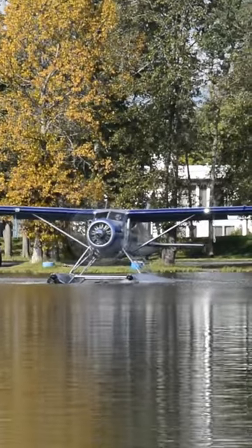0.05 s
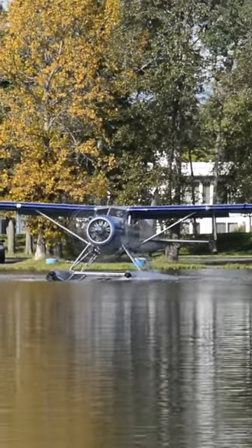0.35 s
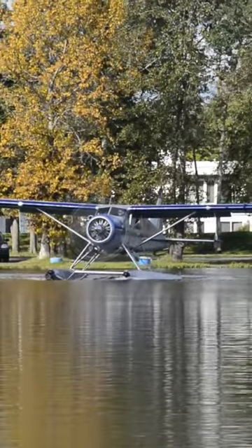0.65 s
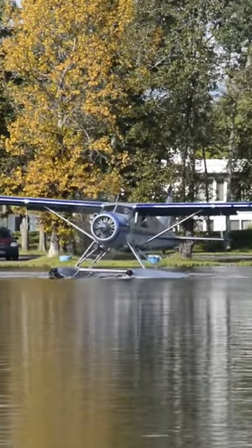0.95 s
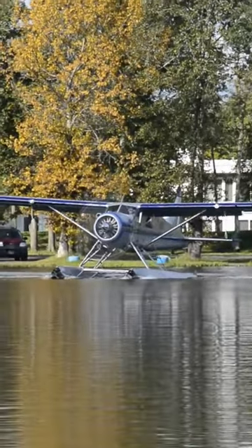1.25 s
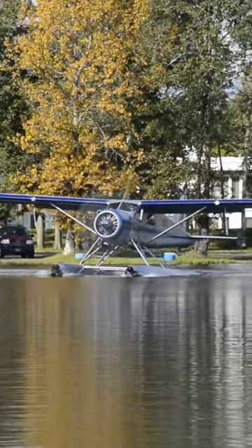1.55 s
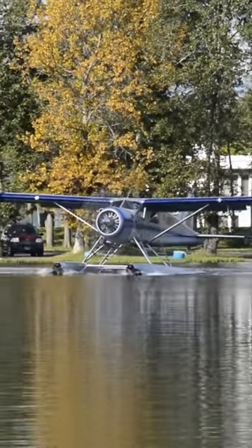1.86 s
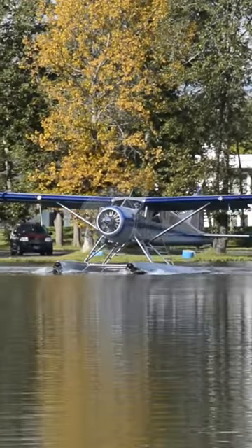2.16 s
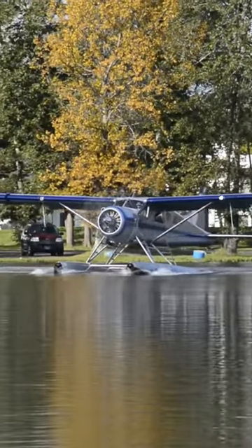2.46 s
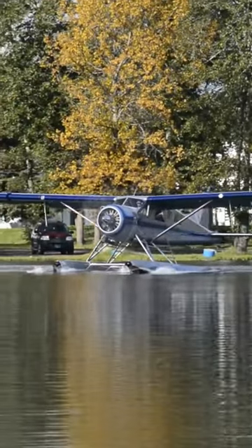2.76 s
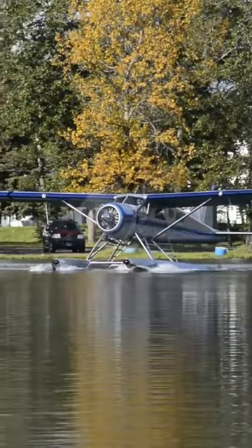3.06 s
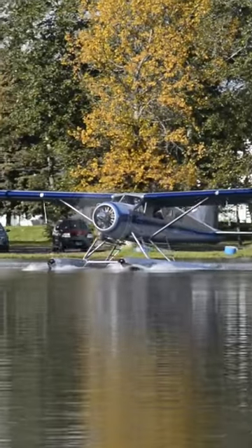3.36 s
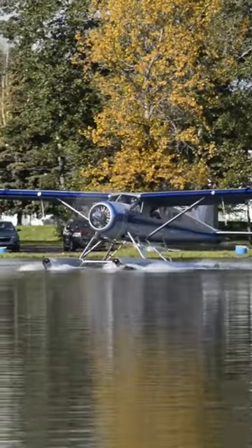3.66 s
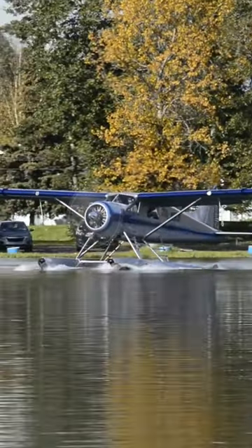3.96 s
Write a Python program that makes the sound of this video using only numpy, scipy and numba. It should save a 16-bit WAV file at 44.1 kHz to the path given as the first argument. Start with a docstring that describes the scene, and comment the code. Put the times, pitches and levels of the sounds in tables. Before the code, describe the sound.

A floatplane's propeller engine revs up, its roar growing louder with rapid blade slaps.

```python
"""On a lake, a floatplane opens its throttle. Its nine-cylinder engine speeds up, the air roars, and
the two propeller blades slap ever harder, echoed by the water and the trees on the shore.
Farther off, a second engine drones at a steady speed. A limiter (an automatic volume control)
turns everything down, drone and microphone hiss included, whenever the slaps get loud."""
import sys
import numpy as np
from scipy import signal
from scipy.fft import rfft, irfft, next_fast_len
from scipy.io import wavfile
from scipy.ndimage import map_coordinates
from numba import njit

SR = 44100
rng = np.random.default_rng(int(sys.argv[2]) if len(sys.argv) > 2 else 0)


def unload_audio(sound):
    """Save the sound as a 16-bit wav file, at the path given as the first command line argument."""
    columns = np.transpose(np.atleast_2d(sound))
    # keep every value between -1 and 1, then stretch to whole-number steps
    steps = np.round(np.clip(columns, -1, 1) * 32767)
    wavfile.write(sys.argv[1], SR, steps.astype(np.int16))


N = 176400
BLADES, CYLINDERS = 2, 9
# how often a blade sweeps past: t/s, rate/Hz
BLADE_RATE = [(0.0, 40.43), (0.6, 44.09), (1.2, 52.24), (1.8, 59.8), (2.4, 67.88), (2.8, 72.26),
              (3.2, 77.39), (3.6, 82.4), (4.0, 88.29)]
# how the blade slaps change: t/s, level/dB, centre f/Hz, share blurred by reflections (0-1)
SLAP_SHAPE = [(0, -22, 550, .8), (.33, -20, 550, .8), (.48, -12, 700, .7), (.68, -17, 600, .8),
              (.87, -9.5, 660, .6), (1.03, -14, 850, .8), (1.17, -10, 680, .7), (1.28, -10, 950, .8),
              (1.39, -7.5, 1200, .6), (1.48, -10, 800, .6), (1.58, -4.5, 740, .1), (1.68, -4.5, 720, .05),
              (1.75, -8, 740, .2), (1.81, -7, 760, .4), (1.93, -11, 1200, .8), (2.0, -7, 720, .4),
              (2.1, -9.5, 760, .6), (2.17, -9, 950, .8), (2.25, -4.5, 680, .6), (2.33, -2.5, 850, .3),
              (2.46, -5, 780, .5), (2.57, -1.5, 850, .3), (2.66, -.5, 680, .1), (2.75, -1.5, 680, .15),
              (2.85, 2.5, 590, .03), (3, 3.5, 780, .02), (3.07, -4, 880, .3), (3.13, .5, 880, .1),
              (3.19, -6, 850, .6), (3.26, -1.5, 770, .1), (3.37, 2.5, 750, .03), (3.54, 4.5, 700, .02),
              (3.66, 1.5, 680, .08), (3.74, 0, 1350, .3), (3.81, 0, 650, .2), (3.9, 1.5, 660, .1),
              (4, 2, 820, .1)]


def amp(db):
    """Turn decibels into a factor to multiply by."""
    return 10 ** (np.asarray(db) / 20)


def unit(x):
    """Scale x to an average (rms) size of 1."""
    return x / np.sqrt(np.mean(x ** 2) + 1e-20)


def curves(rows):
    """Join a table's rows with straight lines: one curve for each column after the time."""
    times, *columns = np.transpose(rows)
    return [np.interp(np.arange(N) / SR, times, column) for column in columns]


def wobble(rate):
    """A smooth curve through `rate` random values a second."""
    return map_coordinates(rng.standard_normal(400), [np.arange(N) * rate / SR], mode="mirror")


def colour(points, hz):
    """How strong each frequency is, read from a table of f/Hz, level/dB."""
    f, db = np.transpose(points)
    return amp(np.interp(np.log(hz + 1), np.log(f + 1), db))


def filtered(x, response):
    """Multiply each frequency in x by response(hz)."""
    size = next_fast_len(N + SR // 2)
    return irfft(rfft(x, size) * response(np.fft.rfftfreq(size, 1 / SR)), size)[:N]


def noise(points):
    """Noise with the given tone colour and an average size of 1."""
    return unit(filtered(rng.standard_normal(N), lambda hz: colour(points, hz)))


def pulses(cycles, jitter_s, scatter_db, pattern=(1,)):
    """One click at each whole cycle, uneven in time (jitter) and size (scatter)."""
    count = np.arange(1, int(cycles[-1]) + 1)
    chance = rng.standard_normal((2000, 2))[count]
    on_time = np.interp(count, cycles, np.arange(N))
    at = np.clip(on_time + SR * jitter_s * chance[:, 0], 0, N - 2)
    size = amp(scatter_db * chance[:, 1]) * np.take(pattern, count, mode="wrap")
    i = at.astype(int)  # each click is shared between two neighbouring samples
    return np.bincount(i, size * (1 - at + i), N) + np.bincount(i + 1, size * (at - i), N)


def delayed(x, seconds):
    """x arriving later; the delay may vary."""
    return np.interp(np.arange(N) - seconds * SR, np.arange(N), x, left=0)


def scattered(x, fade_s):
    """x blurred by countless small reflections that die away by 60 dB in fade_s."""
    tail = rng.standard_normal(SR) * amp(-60 * np.arange(SR) / SR / fade_s)
    return signal.fftconvolve(x, tail / np.linalg.norm(tail))[:N]


def drifting(x, fade_s, rate):
    """x blurred by reflections whose paths change `rate` times a second."""
    paths = np.array([wobble(rate) for _ in range(6)])
    return sum(share * scattered(x, fade_s) for share in paths / np.linalg.norm(paths, axis=0))


def hiss(level_db=-42.5):
    """The microphone's own even hiss."""
    # tone colour of the hiss: f/Hz, level/dB
    hiss_colour = [(30, -12), (3000, 11), (8000, -11), (15000, -13.5)]
    return amp(level_db) * noise(hiss_colour)


def far_engine(waver_db=2, rumble_db=-25):
    """A distant engine at constant speed: wavering tones over a throaty rumble."""
    # the engine's tones: f/Hz, relative level/dB
    drone_tones = [(96.5, -31), (138.5, -45.5), (207.3, -24.5), (279, -31), (414.5, -29.5)]
    # how the tones swell and dip together: t/s, gain/dB
    swell = [(0, 0), (.8, 3), (1.3, -0.5), (1.55, -8), (1.85, 1), (2.5, 1), (2.8, -3), (4, -3.5)]
    # tone colour of the rumble: f/Hz, level/dB
    rumble_colour = [(40, -22), (150, -16), (240, -9.5), (290, -1.5), (335, -7), (390, -1), (460, -6.5),
                     (540, -15.5), (1500, -19.5), (8000, -72)]
    t = np.arange(N) / SR
    tones = sum(amp(db + waver_db * wobble(7.17)) * np.sin(2 * np.pi * hz * t + .5 * wobble(10))
                for hz, db in drone_tones)
    return np.sqrt(2) * amp(curves(swell)[0]) * tones + amp(rumble_db) * noise(rumble_colour)


def exhaust(turns, rumble_db=-2.5):
    """Unequal cylinders each fire once in two shaft turns, over rushing gas and clean low tones."""
    # tone colour of the firings and gas: f/Hz, level/dB
    gas_colour = [(25, -37), (42, -14.5), (60, 1), (100, -4), (170, -1.5), (240, -10), (380, -11),
                  (550, -15), (1000, -20), (3000, -41), (8000, -102)]
    # tones that rise with engine speed: multiple of the shaft rate, relative level/dB
    shaft_tones = [(3, -10.5), (4, -27), (4.5, -19), (5, -21.5), (6, -15), (7, -18.5), (9, -18.5)]
    # loudness of the whole exhaust: t/s, gain/dB
    loudness = [(0, -16), (1.3, -16.5), (1.6, -18.5), (1.87, -15), (2.5, -16.5), (2.9, -19), (3.2, -17.5),
                (3.55, -16.5), (3.75, -13), (4, -14)]
    strengths = amp(2 * rng.standard_normal(CYLINDERS))
    firings = pulses(turns * CYLINDERS / 2, jitter_s=.0006, scatter_db=2.5, pattern=strengths)
    gas = unit(scattered(firings, fade_s=.062)) + rng.standard_normal(N)
    rumble = unit(filtered(gas, lambda hz: colour(gas_colour, hz)))
    tones = sum(amp(db + .34 * wobble(3.84)) * np.sin(2 * np.pi * multiple * turns + .39 * wobble(5.86))
                for multiple, db in shaft_tones)
    return amp(curves(loudness)[0]) * (amp(rumble_db) * rumble + np.sqrt(2) * tones)


def roar(passes, throb_db=1.6, rasp_db=-4, flutter_db=.73):
    """Churned air swells with every passing blade, and scattered blade pulses add a rasp."""
    # tone colour of the roar: f/Hz, level/dB
    roar_colour = [(60, -13), (250, -4.5), (450, 2), (700, -2), (1200, -3.5), (1800, -9), (2400, -10),
                   (3200, -19), (4100, -21.5), (5000, -32.5), (6200, -38.5), (7200, -55.5), (12000, -56.5)]
    # narrow bands that ring out: f/Hz, width/Hz, boost/dB
    resonances = [(1240, 70, 3), (1390, 40, 2), (1525, 45, 4), (1684, 45, 4), (1837, 70, 3.5),
                  (3020, 90, 2)]
    # loudness of the roar: t/s, level/dB
    loudness = [(0, -30), (.7, -28), (1, -25.5), (1.35, -23), (1.65, -23), (1.9, -22), (2.15, -22),
                (2.5, -19), (2.75, -19), (2.95, -18), (3.1, -17), (3.28, -18.5), (3.37, -15), (3.45, -15.5),
                (3.53, -13.5), (3.64, -14.5), (3.73, -9.5), (3.8, -12), (3.9, -14), (4, -12.5)]

    def tone(hz):
        boost_db = sum(db * np.exp(-((hz - centre) / width) ** 2) for centre, width, db in resonances)
        return colour(roar_colour, hz) * amp(boost_db)

    churn = amp(throb_db * np.cos(2 * np.pi * passes)) * rng.standard_normal(N)
    blade_pulses = pulses(passes, jitter_s=.00003, scatter_db=3.5)
    rasp = drifting(blade_pulses, fade_s=.05, rate=5)
    air = filtered(unit(churn) + amp(rasp_db) * unit(rasp), tone)
    return amp(curves(loudness)[0] + flutter_db * wobble(16)) * unit(air)


def cracks(passes, base_db=-18, growth=1.2):
    """The steep front of each slap cracks, more so when it is loud; a few blades snap far harder."""
    # the hardest snaps: t/s, relative level/dB
    hard_snaps = [(2.628, -9), (2.699, -10), (2.837, -6), (2.892, -7), (3.376, -8), (3.55, -5), (3.658, -4),
                  (3.742, -3), (3.823, -5), (3.894, -4)]
    # tone colour of a crack: f/Hz, level/dB
    crack_colour = [(300, -20), (2500, 3), (5000, -1), (8000, -8), (15000, -17)]
    sizes = np.zeros(int(passes[-1]) + 1)
    for time_s, db in hard_snaps:
        nearest_blade = round(passes[round(time_s * SR)])
        sizes[nearest_blade] = amp(db)
    snaps = pulses(passes, jitter_s=0, scatter_db=5, pattern=sizes)
    slap_db = curves(SLAP_SHAPE)[0]
    crackle = amp(base_db + growth * slap_db) * pulses(passes, jitter_s=.0001, scatter_db=4.5)
    return filtered(snaps + crackle, lambda hz: colour(crack_colour, hz))


def propeller(passes, base_hz=700, sway_s=.00039, echo_hold=.25, shore_db=-15):
    """Each blade slaps out a short push-pull wave that arrives clean, blurred and as echoes."""
    # tone colour of a slap centred on base_hz: f/Hz, level/dB
    slap_colour = [(60, -26), (200, -14), (400, -3.5), (620, 0), (900, -2), (1300, -14), (2000, -23),
                   (3000, -33), (4500, -45), (7000, -62), (12000, -88)]
    # echoes from the water and the shore: delay/s, relative level/dB
    echo_paths = [(.0011, -25), (.0029, -21), (.047, -19)]
    level_db, centre_hz, blur = curves(SLAP_SHAPE)
    # 1j turns an even bump into a push and a pull
    wave = filtered(signal.unit_impulse(N, "mid"), lambda hz: 1j * colour(slap_colour, hz))
    wave /= np.abs(wave).max()
    blade = np.round(passes).astype(int)
    since_pass_s = (passes - blade) / curves(BLADE_RATE)[0]
    position = N // 2 + since_pass_s * SR * centre_hz / base_hz  # a higher centre makes a shorter slap
    uneven_db = rng.standard_normal(blade[-1] + 1)[blade]
    slaps = amp(level_db + uneven_db) * np.interp(position, np.arange(N), wave)
    arriving = np.sqrt(1 - blur) * slaps + np.sqrt(blur) * drifting(slaps, fade_s=.022, rate=10)
    echoes = sum(amp(db + 4.2 * wobble(4)) * delayed(slaps, delay_s + sway_s * wobble(2.5))
                 for delay_s, db in echo_paths)
    echoes *= amp(-echo_hold * level_db)  # echoes swell and fade less than the direct wave
    return arriving + echoes + amp(shore_db) * scattered(slaps, fade_s=.6)


def scene():
    """One rising engine speed drives all the plane's sounds, over the far engine and the hiss."""
    passes = np.cumsum(curves(BLADE_RATE)[0]) / SR  # blades that have swept past so far
    plane = propeller(passes) + cracks(passes) + roar(passes) + exhaust(passes / BLADES)
    return (plane + far_engine() + hiss())[None]


@njit
def follow_peaks(level, rise, fall):
    """Jump up with each peak and sink back slowly, never below 1."""
    out, held = np.empty(len(level)), 1.0
    for i in range(len(level)):
        held = max(1.0, held + rise * max(level[i] - held, 0.0) - fall * held)
        out[i] = held
    return out


def limiter(x, ceiling=.53, attack_s=.0002, release_s=.25, clip_top=.72):
    """Peaks over the ceiling turn the volume down for a while; what slips through is rounded off."""
    lowered = x / follow_peaks(np.abs(x) / ceiling, 1 / (attack_s * SR), 1 / (release_s * SR))
    return lowered / (1 + (lowered / clip_top) ** 10) ** (1 / 10)


def record(dry):
    """Hold the peaks down, then cut off the highest treble."""
    return filtered(limiter(dry[0]), lambda hz: hz < 15700)[None]


dry = scene()
out = record(dry)
unload_audio(out)
```